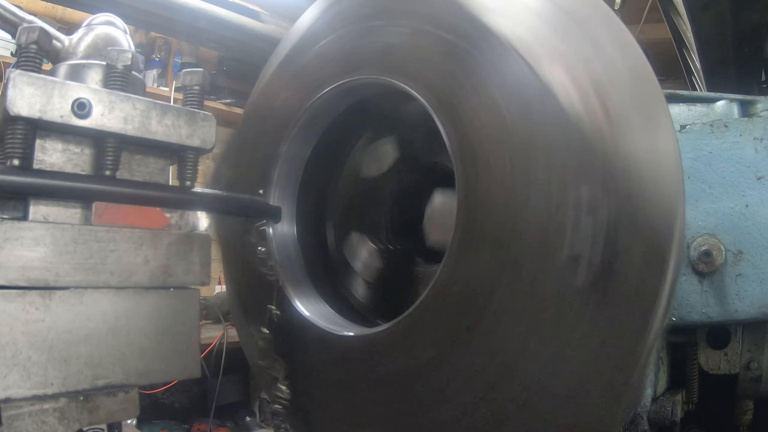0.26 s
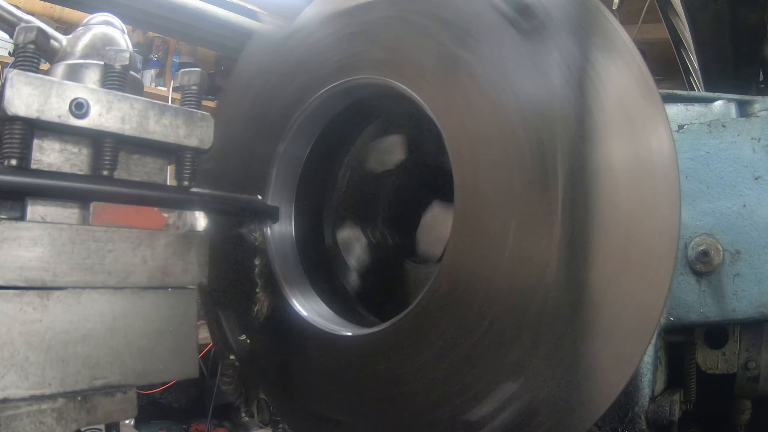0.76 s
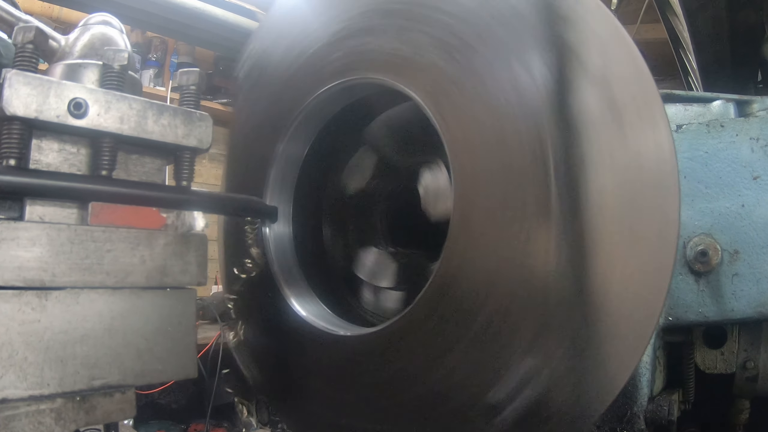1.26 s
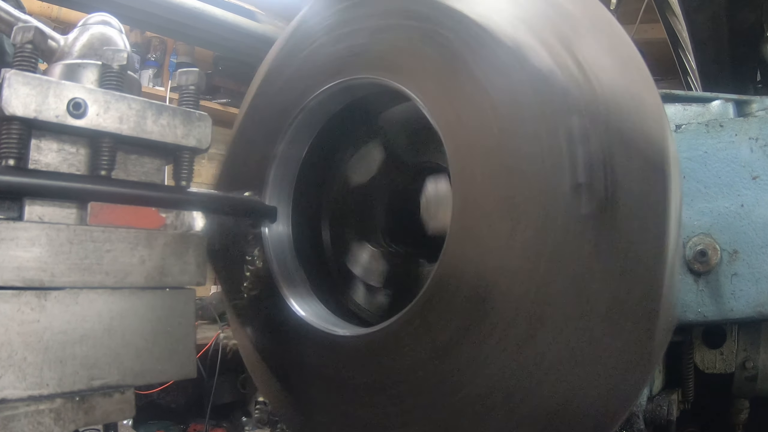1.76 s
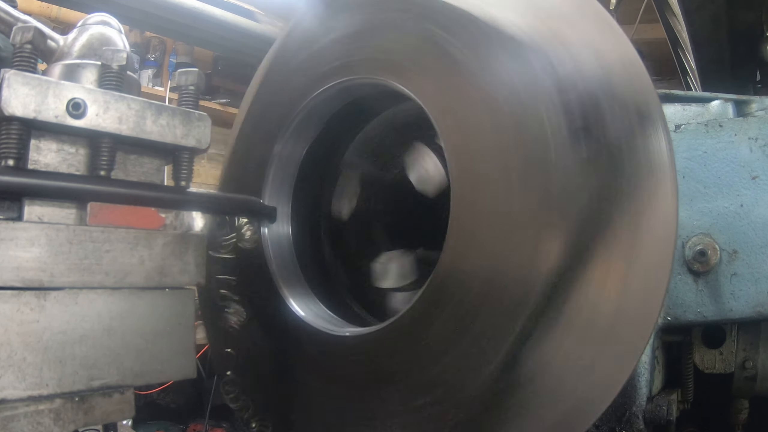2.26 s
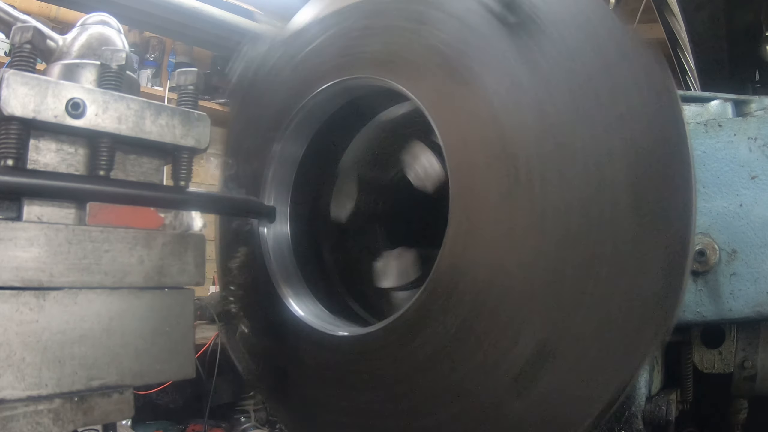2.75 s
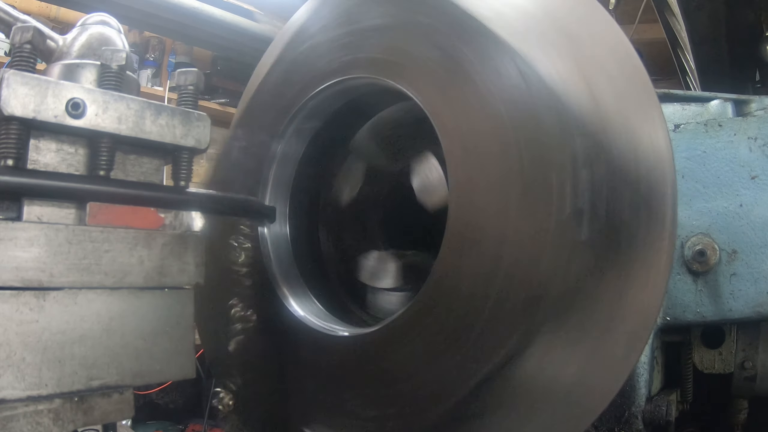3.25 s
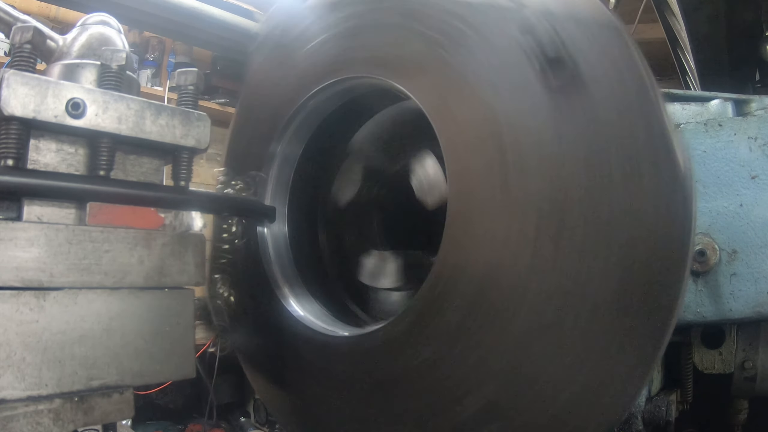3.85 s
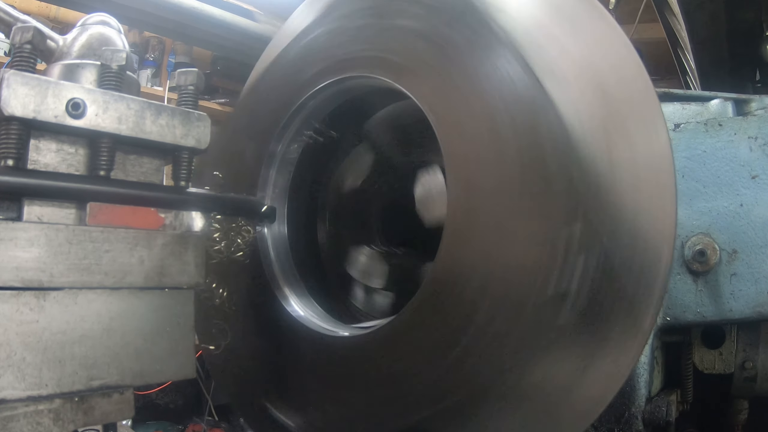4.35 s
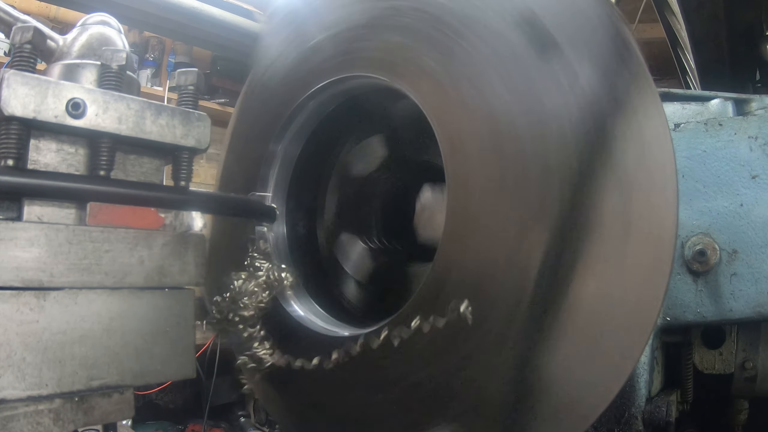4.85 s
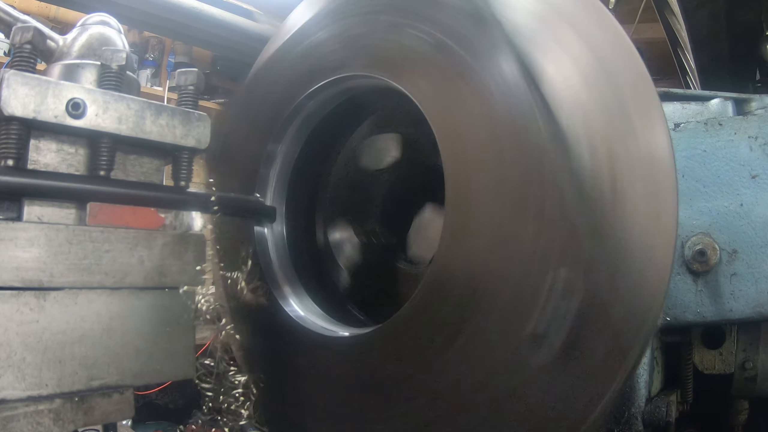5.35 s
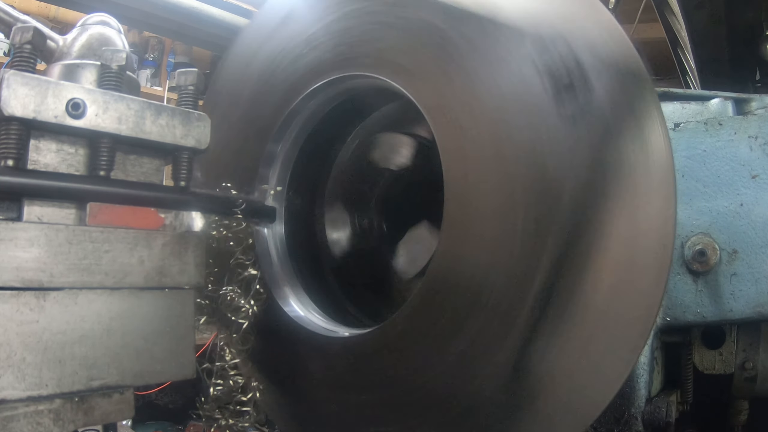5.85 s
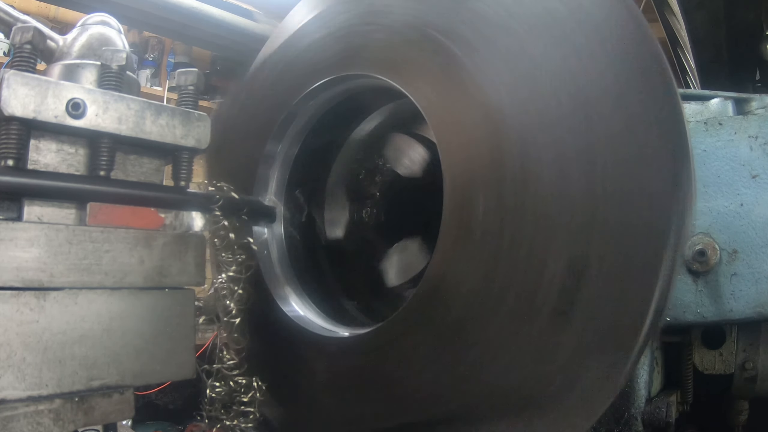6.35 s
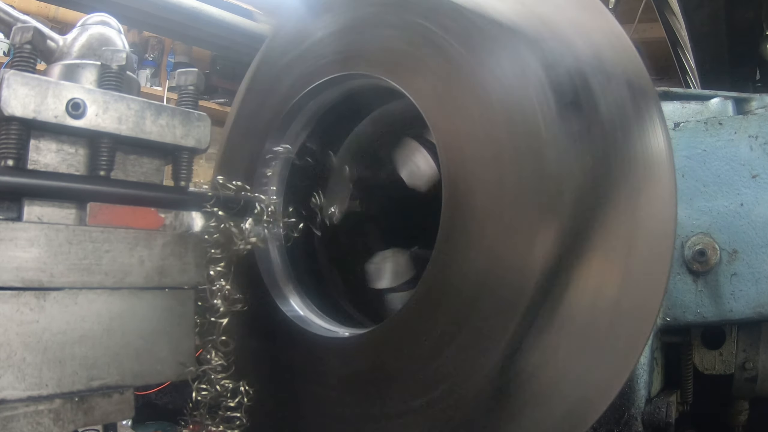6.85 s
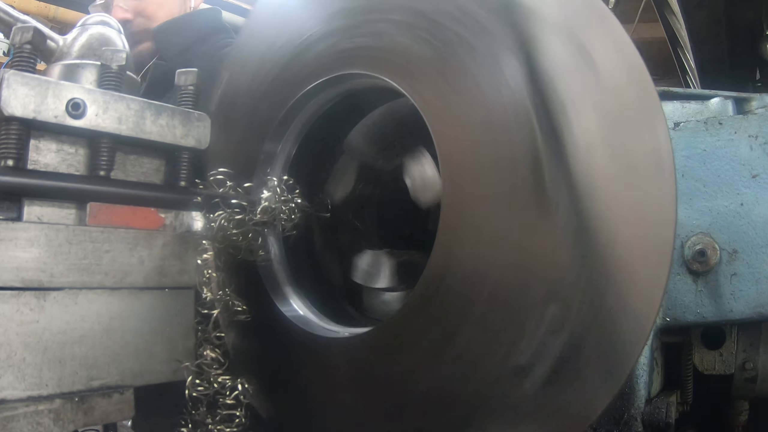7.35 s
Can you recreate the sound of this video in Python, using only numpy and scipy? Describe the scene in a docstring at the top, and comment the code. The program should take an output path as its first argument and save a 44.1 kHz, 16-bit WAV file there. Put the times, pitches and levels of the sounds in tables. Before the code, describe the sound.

Close by, a lathe's boring bar chatters in a large spinning steel disc, making a piercing squeal that throbs with each turn. After about two and a half seconds, a small click marks an abrupt change to a slower, rougher, fluttering squeal. The cut hisses lightly, and steel curls crackle and occasionally scrape. Underneath, the workshop machine's motor and gears hum, whine and rumble throughout.

```python
"""A piercing, throbbing squeal, close by: a lathe's boring bar chatters in a large steel disc.
The squeal throbs as the ringing disc turns. A fast pass cuts, with a click, to a slower, rougher one.
The tearing chip hisses, and curls of steel crackle and scrape round the bore.
Underneath, motor and gears hum and whine over the rumble of the headstock."""
import sys
import numpy as np
from scipy import signal
from scipy.fft import rfft, irfft, next_fast_len
from scipy.io import wavfile
from scipy.ndimage import uniform_filter1d, minimum_filter1d

SR = 44100
rng = np.random.default_rng(int(sys.argv[2]) if len(sys.argv) > 2 else 0)


def to_wav(s):
    """Save 16-bit WAV."""
    ch = np.atleast_2d(s).T  # columns
    pcm = np.round(np.clip(ch, -1, 1) * 32767)  # PCM
    wavfile.write(sys.argv[1], SR, pcm.astype(np.int16))


N = 336042
T = np.arange(N) / SR
CHANGE_S = 2.467  # fast pass to slow pass


def fast_pass(turns_per_s=3.408):
    """The bar sings steadily, dipping at the disc's nodes, over the drive."""
    # chatter: (time [s], pitch [Hz], level [dB])
    cut = [(0, 2755, -12.5), (0.5, 2753, -10.0), (0.95, 2754, -11.0), (1.3, 2756, -10.0),
           (2.25, 2752, -11.5), (2.45, 2745, -14)]
    # motor and gear tones: (frequency [Hz], level [dB])
    hum = [(100, -17), (145.3, -26), (200, -29), (249.5, -33.5), (277, -31), (300, -32), (400, -34),
           (424.7, -40.5), (500.5, -44), (600.4, -42.5), (799.5, -47), (822.2, -36.5), (1256, -54),
           (2180, -60.5)]
    # bearing spectrum: (frequency [Hz], relative density [dB])
    rumble = [(10, -34), (25, -3), (55, -1.5), (88, 9), (118, -10), (155, 6), (190, -0.5), (280, -1),
              (450, -9.5), (900, -15), (1100, -21), (1230, -15), (1500, -29), (3000, -64)]
    ring = scattered(throb(turns_per_s, blur_hz=55), share=.025, width_hz=24, hold_s=.29)
    bar = cutting(cut, ring, waver_hz=5.4, smear=.37, smear_hz=55,
                  rasp_db=-30.5, shake_db=-30.5, overtones_db=-25.5, hiss_db=-39)
    motor = drive(hum, rumble, rumble_db=-20.5, unsteady=.27, unsteady_hz=6)
    return bar + motor + whine(hz=1245, db=-44, swell=0, wander_db=.5)


def slow_pass(turns_per_s=3.027):
    """The bar chatters roughly as waves in the disc beat, over the drive."""
    # chatter: (time [s], pitch [Hz], level [dB])
    cut = [(2.49, 2750, -16.5), (2.8, 2759, -12.5), (3.0, 2751, -17.5), (3.4, 2757, -16.5),
           (3.7, 2757, -13.0), (4.15, 2757, -15.0), (5.4, 2758, -13.5), (6.2, 2754, -14.0),
           (6.5, 2746, -15.5), (6.9, 2757, -13.5), (7.35, 2751, -18.0), (7.62, 2756, -14.0)]
    # motor and gear tones: (frequency [Hz], level [dB])
    hum = [(50, -51.5), (79, -41.5), (131.5, -28), (145, -37.5), (195.5, -27.5), (341, -60), (359, -40.5),
           (391, -34), (586, -48), (774.3, -53.5), (863, -46), (2180, -72.5)]
    # bearing spectrum: (frequency [Hz], relative density [dB])
    rumble = [(10, -7), (30, -2), (55, 5.5), (85, 6.5), (160, 5), (220, 1), (380, -2.5), (450, -7.5),
              (600, -11.5), (900, -12.5), (1060, -20.5), (1200, -12.5), (1500, -27.5), (3000, -60)]
    ring = scattered(beating(turns_per_s), share=.11, width_hz=32, hold_s=.11)
    bar = cutting(cut, ring, waver_hz=3.5, smear=1.84, smear_hz=43,
                  rasp_db=-31.5, shake_db=-30, overtones_db=-28.5, hiss_db=-40.5)
    motor = drive(hum, rumble, rumble_db=-21, unsteady=.37, unsteady_hz=7)
    return bar + motor + whine(hz=1245, db=-45, swell=.6, wander_db=3)


def cutting(cut, ring, waver_hz, smear, smear_hz, rasp_db, shake_db, overtones_db, hiss_db):
    """The bar chatters at its bending mode; impacts add overtones, the tearing chip rasp and hiss."""
    # overtones: (chatter multiple, high-mode multiple, Doppler [Hz], relative level [dB], scatter weight)
    partials = [(2, 0, -2, -11, 0.32), (3, 0, 3, 0.5, 0.19), (4, 0, 19, -7.5, 0.8), (5, 0, 26, -22, .6),
                (0, 1, 4, -17.5, .5), (1, 1, 7, -40.5, .3)]
    # hiss of the cut: (frequency [Hz], relative density [dB])
    hiss_spectrum = [(600, -10), (1700, 4.5), (2200, 8), (3000, 5), (3900, -0.5), (5000, -1), (6800, -11.5),
                     (8300, -7.5), (9300, -20.5), (10000, -28), (11300, -10), (13500, -13), (14400, -32.5),
                     (15300, -49)]
    high_mode_hz, shake_hz = 12960, 145.3
    pitch_hz, squeal_db = curves(cut)
    load = load_db()
    chatter = phasor(pitch_hz + waver_hz * drift(14) + 3.1 * drift(150))
    high_mode = phasor(high_mode_hz + 10 * drift(30))
    # machine vibration: a faint sideband below the squeal
    shake = amp(shake_db) * np.exp(-2j * np.pi * shake_hz * T) * scattered(1, share=.24, width_hz=25)
    squeal = chatter * (ring + shake + amp(rasp_db) * flutter(170))
    grip = amp(.34 * drift(59)) * (1 + amp(-17.5) * flutter(260))  # uneven bite of the edge
    overtones = 0
    for k, m, doppler_hz, db, scatter in partials:
        partial = chatter ** round(k) * high_mode ** round(m) * np.exp(2j * np.pi * doppler_hz * T)
        overtones += amp(db) * partial * scattered(.89, scatter * smear, smear_hz)
    tone = amp(squeal_db) * squeal + amp(overtones_db + .85 * load) * evened(grip * overtones)
    hiss = amp(hiss_db + .86 * load + 1.3 * drift(24)) * noise(hiss_spectrum)
    return np.sqrt(2) * tone.real + hiss


def throb(turns_per_s, blur_hz):
    """Each passing node of the disc dips the tone and swings its phase; ringing rounds the dips."""
    # disc nodes: (place [turns], half width signed by phase swing [turns], depth before rounding [0-1])
    nodes = [(.155, -0.069, 0.71), (.64, 0.016, 0.85), (.87, -0.0059, 1)]
    turn = np.arange(1024) / 1024
    orders = np.fft.fftfreq(1024, 1 / 1024)
    gain = 1
    for place, width, depth in nodes:
        offset = np.tan(np.pi * (turn - place)) / np.pi
        gain *= 1 - depth * width / (width + 1j * offset)
    rounding = np.exp(-(orders * turns_per_s / blur_hz) ** 2)
    gain = np.fft.ifft(np.fft.fft(gain) * rounding)
    return evened(np.interp(turns_per_s * T, turn, gain, period=1))


def beating(turns_per_s):
    """Waves circling the disc both ways split the squeal into beating tones; friction caps the peaks."""
    # disc waves: (offset from the chatter [turn rates], relative level [dB])
    waves = [(-10, -13), (-9, -12), (-8, -5), (-7, -6), (-4, 0), (-3, 0), (-1, -5), (0, -4), (1, -1),
             (2, -10), (4, -11), (5, -5), (6, -7), (10, -12), (15, -18)]
    turns = turns_per_s * T
    ring = evened(sum(amp(db) * np.exp(2j * np.pi * (k * turns + rng.random())) for k, db in waves))
    capped = ring / np.sqrt(.5 + abs(ring) ** 2)
    node_phase = 2 * np.pi * 9 * turns  # nine nodes a turn
    pulse = 1 + .36 * np.cos(node_phase) - .16 * np.cos(2 * node_phase)
    return evened(capped * pulse)


def scattered(direct, share, width_hz, hold_s=.14):
    """Reflections off the spinning work smear part of a tone into a narrow band at steady mean power."""
    share = np.clip(share, 0, .9)
    tone = np.sqrt(1 - share) * direct + np.sqrt(share) * flutter(width_hz)
    return tone / np.sqrt(uniform_filter1d(abs(tone) ** 2, size=int(hold_s * SR)))


def load_db(easing_db_per_s=.34):
    """Load on the edge: eases through each pass, shifts with each bite."""
    # more or less metal than usual: (time [s], half length [s], load [dB])
    bites = [(.2, 0.26, 1.6), (2.4, .13, 3), (2.79, .12, -3), (3.08, .14, 3), (3.43, .15, 3),
             (4.23, 0.084, 4), (5.2, .1, 1.5), (7.42, 0.24, 3)]
    into_pass_s = np.where(T < CHANGE_S, T, T - CHANGE_S)
    return bumps(bites) - easing_db_per_s * into_pass_s


def drive(hum, rumble, rumble_db, unsteady, unsteady_hz):
    """Wavering motor and gear tones over bearing rumble that grows with load."""
    # dull headstock thuds: (time [s], rumble boost [dB])
    thuds = [(.52, 2), (1.07, 1), (1.62, 1.5), (3.44, 2), (5.539, 1.5), (7.301, 2.5)]
    thud_half_s = .05
    speed = 1 + .0011 * drift(3.7)
    tones = 0
    for hz, db in hum:
        rotation = np.exp(2j * np.pi * rng.random()) * phasor(hz * speed)
        tones += amp(db) * (rotation * (1 + unsteady * flutter(unsteady_hz))).real
    thuds_db = bumps((s, thud_half_s, db) for s, db in thuds)
    bearings_db = rumble_db + .7 * load_db() + thuds_db + .75 * drift(19)
    return np.sqrt(2) * tones + amp(bearings_db) * noise(rumble)


def whine(hz, db, swell, wander_db, swells_per_s=4.66):
    """One gear mesh swells with its shaft, at random and under load."""
    shaft = 1 + swell * np.cos(2 * np.pi * swells_per_s * (T - CHANGE_S))
    level_db = db + .74 * load_db() + wander_db * drift(18)
    return amp(level_db) * shaft * evened(phasor(hz + 6 * drift(12)).real)


def chips(per_s, spread_db, t60_s, dull_hz):
    """Steel curls snap off in tiny noise bursts; longer, duller ones scrape round the bore."""
    # chip spray: (time [s], level [dB])
    spray = [(0, -56), (2.4, -49), (2.8, -61), (5, -59), (7.1, -61), (7.4, -45), (7.62, -47)]
    # crackle spectrum: (frequency [Hz], relative density [dB])
    colour = [(500, -12), (1400, 6), (3000, 3.5), (5000, -4), (7000, -12.5), (9700, -19), (11500, -7.5),
              (13500, -10.5), (15300, -40)]
    # swarf scrapes: (time [s], level [dB], half length [s])
    scrapes = [(0.184, -35.5, .04), (.74, -41, .03), (2.11, -35, 0.031), (5.47, -41, 0.018),
               (5.642, -39, 0.025), (6.862, -44, 0.026), (7.297, -32, 0.024)]
    snaps = (rng.random(N) < per_s / SR) * amp(spread_db * np.minimum(rng.exponential(1, N), 4))
    decay = amp(-60 * T[:2048] / t60_s)
    bursts = evened(signal.oaconvolve(snaps, decay)[:N])
    crackle = bursts * noise(colour)
    dull = signal.lfilter(*signal.butter(1, dull_hz, fs=SR), bursts * noise(colour))
    scrape_gain = bumps((s, half_s, amp(db)) for s, db, half_s in scrapes)
    return amp(curves(spray)[0]) * crackle + scrape_gain * evened(dull)


def click(hz, db, t60_s, rise_s=.001):
    """A short click where the sound cuts abruptly from fast to slow."""
    age_s = np.maximum(T - CHANGE_S, 0)
    rise = 1 - np.exp(-age_s / rise_s)
    return amp(db - 60 * age_s / t60_s) * rise * np.sin(2 * np.pi * hz * age_s)


def treble_width(x, above_hz, side_db, delay_s=.013):
    """The top treble is spread slightly between the ears."""
    treble = signal.sosfilt(signal.butter(12, above_hz, "high", fs=SR, output="sos"), x)
    side = amp(side_db) * np.interp(T - delay_s, T, treble, left=0)
    return np.array([x + side, x - side])


def amp(db):
    """Decibels to gain."""
    return 10 ** (np.asarray(db) / 20)


def evened(x):
    """Scale to unit rms."""
    return x / np.sqrt(np.mean(abs(x) ** 2) + 1e-20)


def curves(rows):
    """One curve per column after the first, time [s]."""
    times_s, *columns = np.transpose(rows)
    return [np.interp(T, times_s, column) for column in columns]


def bumps(rows):
    """Gaussian humps from (time [s], half length [s], height)."""
    return sum(height * np.exp(-((T - s) / half_s) ** 2) for s, half_s, height in rows)


def noise(spectrum):
    """Unit-rms noise shaped by (frequency [Hz], relative density [dB])."""
    hz, db = np.transpose(spectrum)
    bins_hz = np.fft.rfftfreq(N, 1 / SR)
    gain = amp(np.interp(np.log(bins_hz + 1), np.log(hz), db))
    return evened(irfft(rfft(rng.standard_normal(N)) * gain, N))


def flutter(width_hz):
    """Complex random motion around 0 Hz, unit rms."""
    size = next_fast_len(N)
    white = rng.standard_normal(size) + 1j * rng.standard_normal(size)
    falloff = np.exp(-abs(np.fft.fftfreq(size, 1 / SR) / width_hz) ** .96)
    return evened(np.fft.ifft(white * falloff)[:N])


def drift(width_hz):
    """Real random motion, unit rms."""
    return evened(flutter(width_hz).real)


def phasor(hz):
    """Unit rotation along a frequency curve."""
    return np.exp(2j * np.pi * np.cumsum(hz) / SR)


def scene():
    """Fast pass, then abruptly the slow one; chips throughout."""
    change = .5 + .5 * np.tanh((T - CHANGE_S) / .0012)
    lathe = (1 - change) * fast_pass() + change * slow_pass()
    lathe += click(hz=2970, db=-24, t60_s=.019)
    lathe += chips(per_s=490, spread_db=.5, t60_s=.02, dull_hz=3200)
    return treble_width(lathe, above_hz=12300, side_db=-2.5)


def record(dry):
    """Peak limiter, then low-pass."""
    window_samples, cutoff_hz = 441, 15800
    safe_gain = 1 / np.maximum(abs(dry).max(axis=0), 1)
    gain = uniform_filter1d(minimum_filter1d(safe_gain, size=window_samples), size=window_samples)
    lowpass = signal.firwin(1023, cutoff_hz, window=("kaiser", 9), fs=SR)
    return signal.oaconvolve(dry * gain, lowpass[None], "same")


dry = scene()
out = record(dry)
to_wav(out)
```